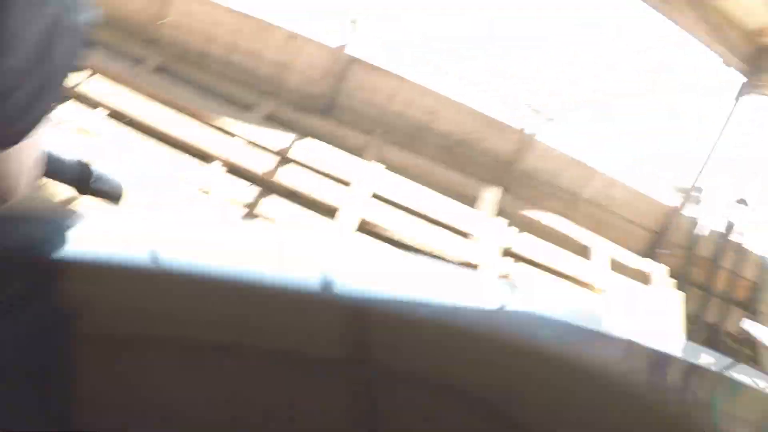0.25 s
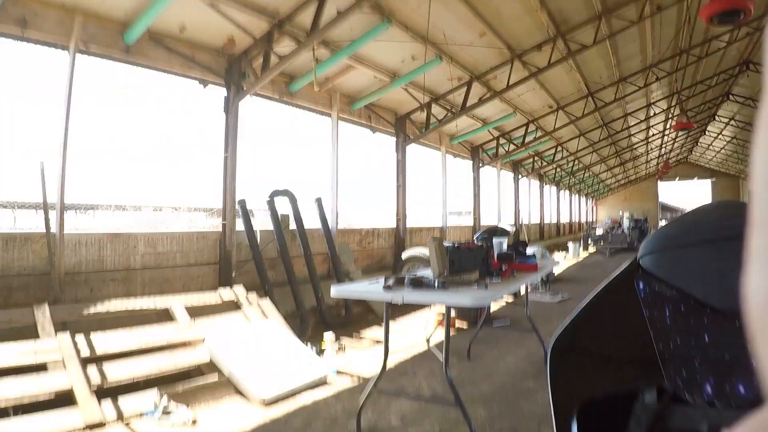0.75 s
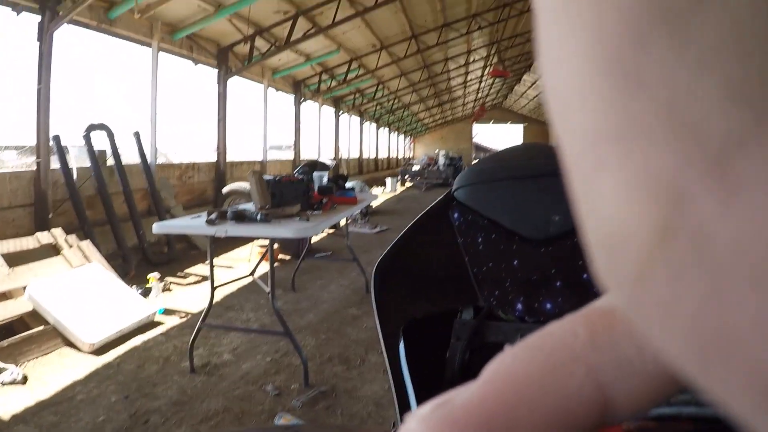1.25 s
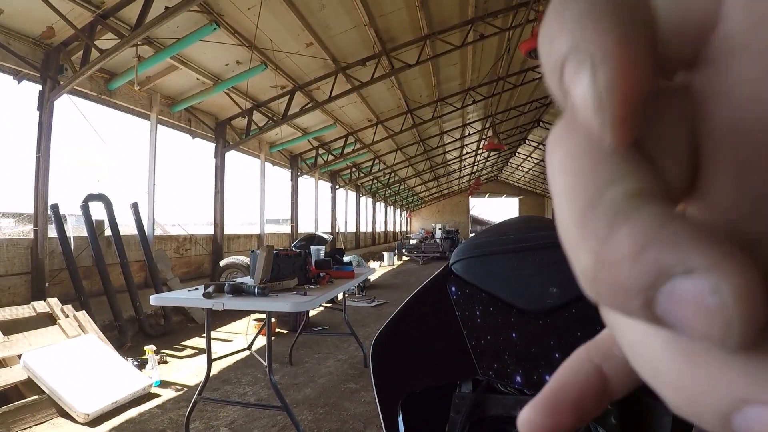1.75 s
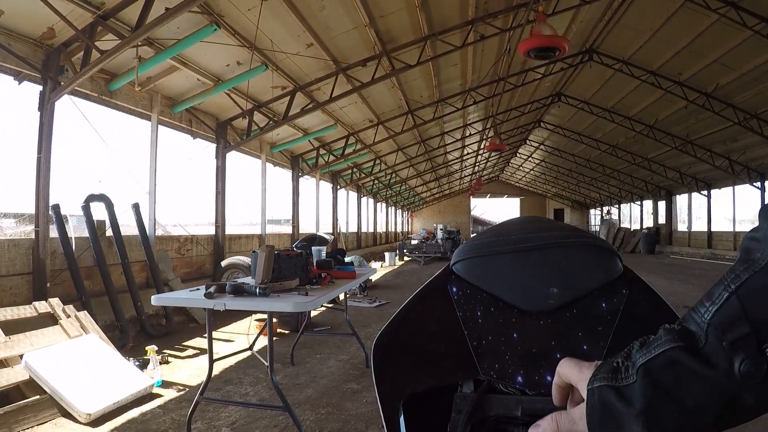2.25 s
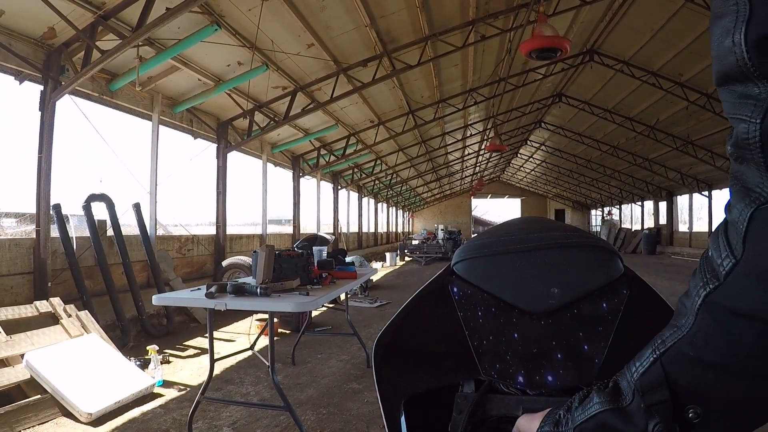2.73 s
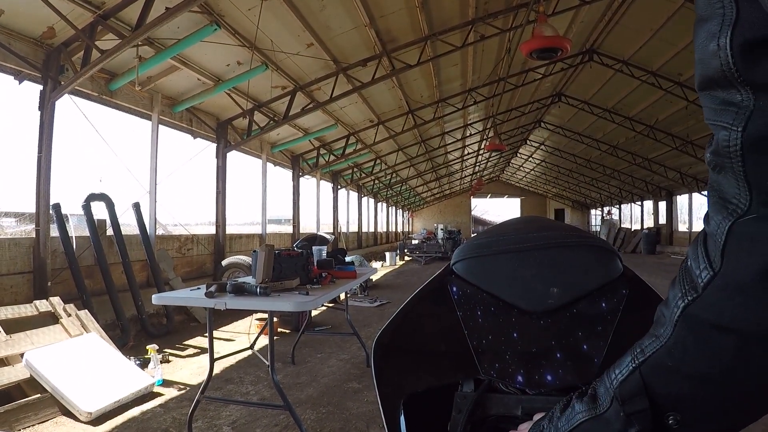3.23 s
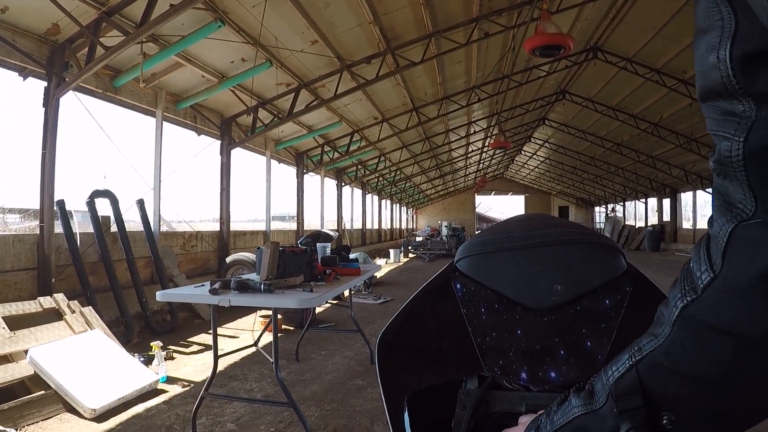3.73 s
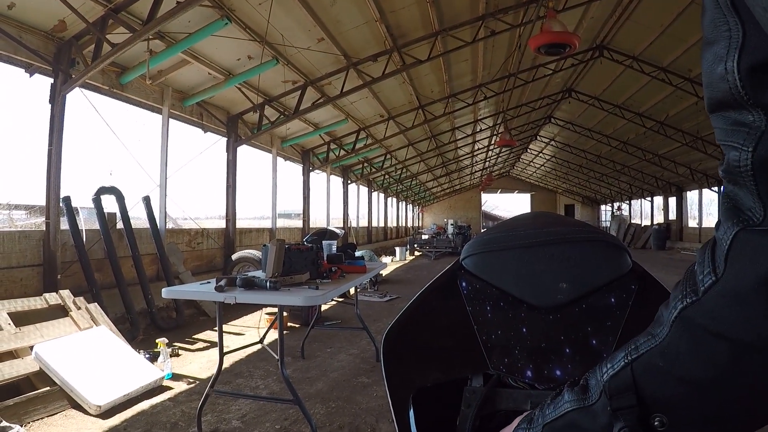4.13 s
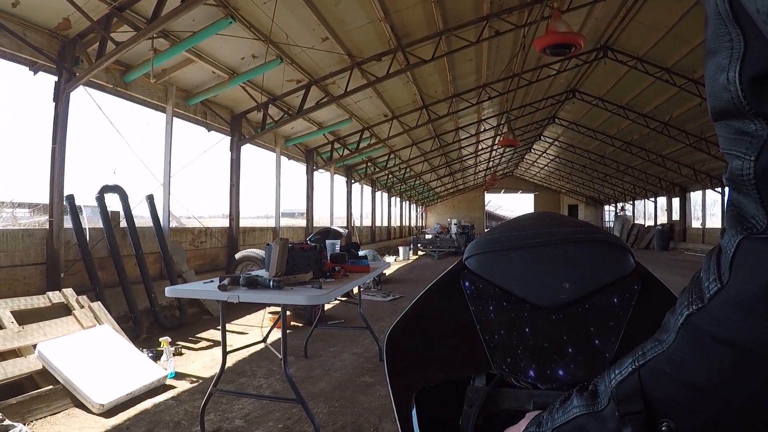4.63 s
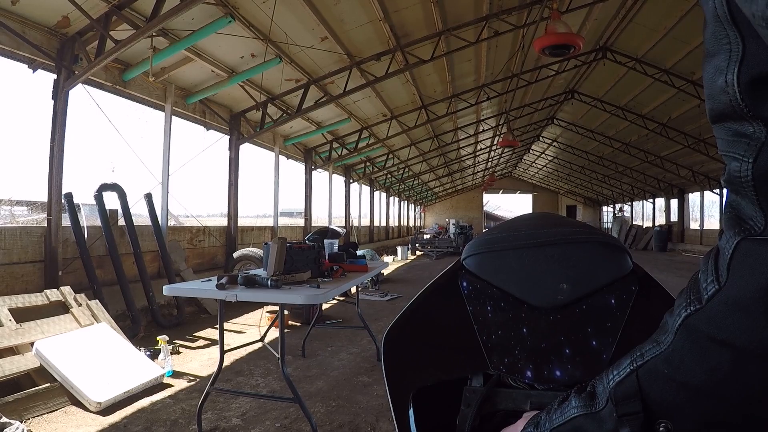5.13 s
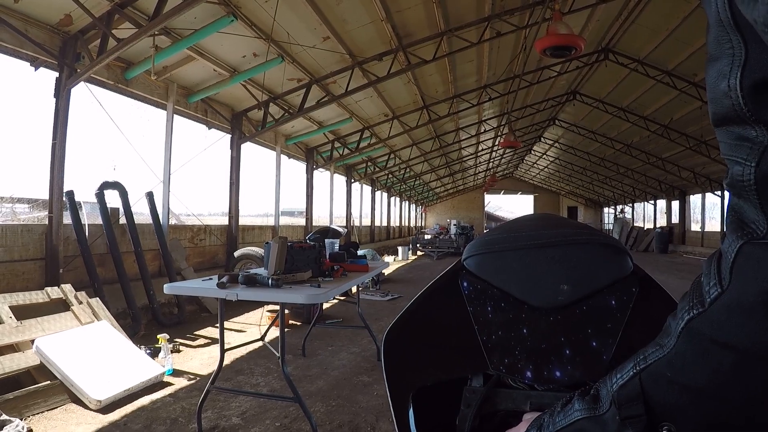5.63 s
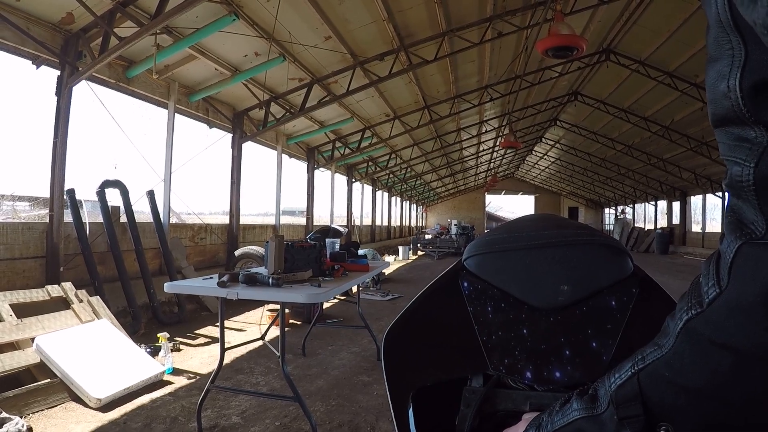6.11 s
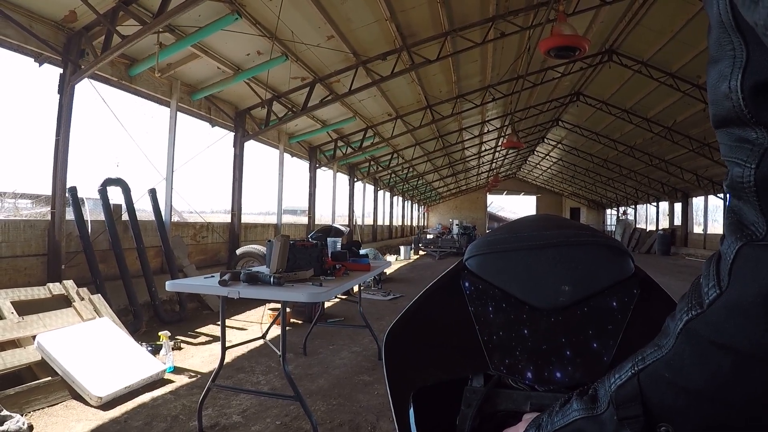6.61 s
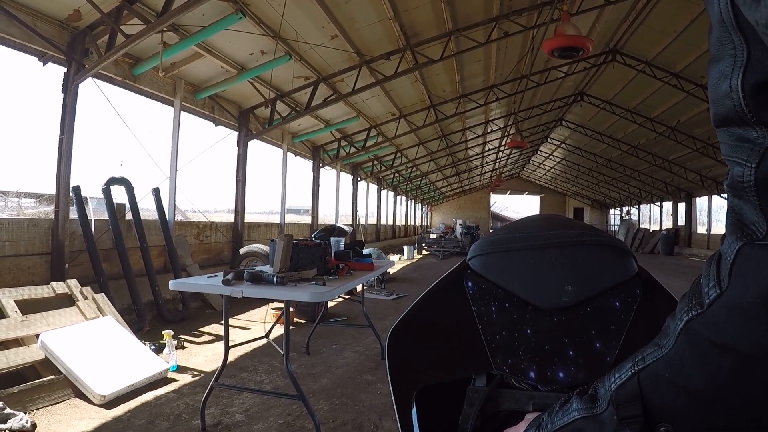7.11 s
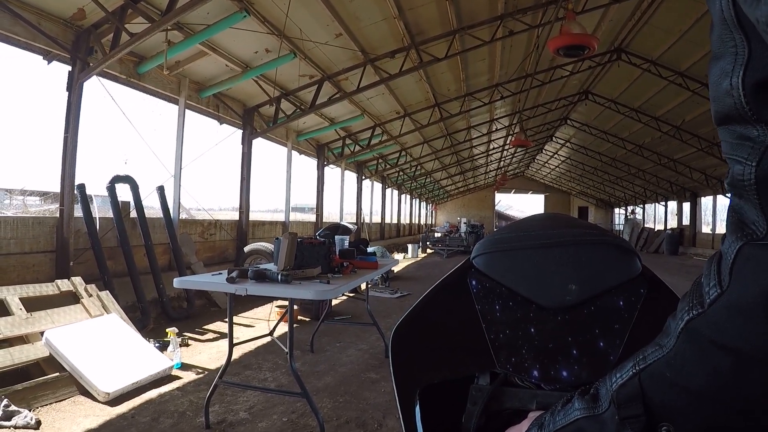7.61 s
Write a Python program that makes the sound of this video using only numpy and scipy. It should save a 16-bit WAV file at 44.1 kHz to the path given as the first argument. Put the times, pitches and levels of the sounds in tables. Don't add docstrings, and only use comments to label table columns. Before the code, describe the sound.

A four-cylinder motorcycle engine is already held against its rev limiter and stays there for nearly 8 seconds: a dense, loud drone with its strongest tone near 125 Hz, rich harmonics up to several hundred hertz, and tiny pitch wavers. Uneven firing adds a rough, rapid flutter, strongest at the start; turbulent valve and intake hiss spreads wide above it. From 0 to 0.8 s the close stereo microphone is moved: a grip at left, a brief skin brush at 0.18, low wind thumps near 0.2, 0.46 and 0.7, pressing rubs at 0.67, then a clatter of plastic clicks from 0.73 to 0.81. A faint release rub comes at 1.07. From 1.4 s the loose housing buzzes raspily with every firing, fullest around 3.4, weakening after 4.5 and gone by about 7.3. The engine continues unchanged, with short diffuse barn reflections, and never drops to idle.

```python
import sys
import numpy as np
from scipy import signal
from scipy.fft import rfft, irfft
from scipy.io import wavfile
from scipy.ndimage import uniform_filter1d, minimum_filter1d

SR = 44100
rng = np.random.default_rng(int(sys.argv[2]) if len(sys.argv) > 2 else 0)


def unload_audio(sound):
    columns = np.transpose(np.atleast_2d(sound))
    steps = np.round(np.clip(columns, -1, 1) * 32767)
    wavfile.write(sys.argv[1], SR, steps.astype(np.int16))


def attenuation_scalar(level_db):
    decades = np.asarray(level_db, float) / 20
    return 10 ** decades


N = 346626

# time in seconds, speed in turns per second (Hz).
CRANK_SPEED = [(0, 62.3), (.15, 63.0), (.45, 62.2), (.75, 62.5), (1.05, 61.8), (1.25, 62.05), (2.35, 60.85),
               (2.65, 61.45), (4.2, 61.42), (4.35, 61.85), (4.5, 61.0), (4.85, 61.55), (5.7, 61.3),
               (5.85, 60.85), (6.3, 61.4), (6.5, 62.25), (7.5, 62.25), (7.86, 61.5)]
# multiple of crank speed, rms level in dB.
HUM_ORDERS = [(1, -31), (1.5, -25), (2, -13), (2.5, -27), (3, -26), (3.5, -50.5), (4, -31.5), (4.5, -32.5),
              (5, -20.5), (5.5, -36), (6, -18.5), (6.5, -37.5), (7, -30.5), (7.5, -52), (8, -27.5),
              (8.5, -37), (9, -50.5), (9.5, -37), (10, -31), (10.5, -39), (11, -45), (11.5, -44),
              (12, -39.5), (14, -53.5), (16, -49.5), (20, -59), (24, -60.5)]
# frequency in Hz, width in Hz, level in dB.
EXHAUST_MODES = [(74, 19, 4.5), (130, 57.5, 2.5), (196, 52, -2), (270, 34.7, -4), (361.4, 24.6, -7.5),
                 (447, 14.7, -10), (502.4, 43, -6.5), (591, 27.3, -11), (668, 35, -14), (725, 78, -28.5)]
# frequency in Hz, density in dB per Hz.
HISS_SPECTRUM = [(470, -35.5), (800, -2.5), (929, -3.5), (973, -8), (1180, -8), (1670, -12), (1960, -17),
                 (2150, -17), (2530, -21.5), (3180, -19.5), (4000, -22.5), (4150, -23.5), (6880, -21.5),
                 (10400, -35.5), (12500, -81), (16300, -109), (22000, -120)]
# frequency in Hz, side against middle in dB.
HISS_SIDE = [(60, -24), (110, -21.5), (190, -15.5), (350, -7.5), (630, -1), (1140, 3.5), (2060, 3),
             (3710, 0), (6690, -1.5), (12100, -17)]
# frequency in Hz, width in Hz, level in dB.
CAVITY_MODES = [(3460, 150, 1.5), (6940, 1100, -0.5)]
# time in seconds, level in dB.
FACING = [
    (0, -0.5),
    (.08, 2),
    (.3, -6),
    (.55, 1.5),
    (.9, -2),
    (1.3, -1.5),
    (3, 3),
    (4, -1),
    (5, -1),
    (7.86, 0.5),
]
# frequency in Hz, density in dB per Hz.
RUB_SPECTRUM = [(200, -4), (400, -2), (900, -14.5), (2000, -20), (4000, -25.5), (6500, -22), (10000, -31),
                (14000, -44.5), (16000, -74)]
# start in seconds, hold in seconds, level in dB,
# left minus right in dB.
STROKES = [
    (0, 0.0015, -38, 18),
    (0.183, 0.0074, -32, 10.5),
    (0.524, 0.05, -67, 4),
    (0.669, 0.09, -41, 6),
    (.76, 0.06, -45.5, -11.5),
    (1.07, .004, -45, -3.5),
]
# peak time in seconds, level in dB.
GUSTS = [
    (.14, -29),
    (.2, -22),
    (.46, -22),
    (.7, -22),
]
# start in seconds, peak in dB, length in seconds, brightness in dB.
CLICKS = [(0.548, -47, 0.00073, 13), (0.7292, -27.5, .001, 7), (0.7334, -24.5, 0.0013, 2),
          (0.734, -18, 0.002, -1.5), (0.7447, -29.5, 0.0011, -2.5), (0.747, -26, 0.0014, 0.5),
          (0.756, -23.5, 0.0027, -7), (0.7585, -26, 0.0033, -3.5), (0.765, -21.5, 0.0023, -7),
          (0.778, -38, 0.0033, -3), (0.7797, -24, 0.0012, 1.5), (0.786, -24.5, 0.0018, -7.5),
          (0.789, -28, 0.00077, -1), (0.794, -26.5, 0.0015, -5), (0.794, -23, 0.0016, 0),
          (0.808, -22.5, 0.0033, -5.5)]
# frequency in Hz, width in Hz, level in dB.
MOUNT_MODES = [(1400, 220, -3), (2610, 430, 1.5), (3630, 490, -0.5), (6100, 1100, -3), (9500, 5200, -17)]
# time in seconds, buzz level in dB.
LOOSENESS = [
    (1.4, -45),
    (3.4, -41),
    (4.25, -42),
    (4.8, -45.5),
    (6.5, -49),
    (6.75, -46),
    (6.9, -47),
    (7.2, -50.5),
    (7.3, -65),
]
# frequency in Hz, density in dB per Hz.
BUZZ_SPECTRUM = [(600, 2), (1000, 3.5), (1800, -19.5), (2550, -6), (3100, -14), (3700, -11.5), (4800, -16),
                 (5700, -7), (7000, -11), (9000, -19.5), (12500, -29.5), (16000, -61.5)]
# frequency in Hz, left minus right in dB.
PORT_BALANCE = [(30, -4), (75, 1), (125, -1), (185, -3), (250, -3), (310, -8.5), (370, -6.5), (490, -13.5),
                (630, -13.5), (740, -5.5), (1140, -3.5), (2060, -0.5), (3710, -2.5), (6690, -14.5),
                (12100, 2.5)]
# frequency in Hz, left's lead in radians.
PORT_LEAD = [(60, -.2), (90, -.25), (125, -.48), (185, -.2), (250, .4), (340, 0), (490, .8), (650, 2.6),
             (1380, 2.2), (1810, .8), (2500, 1.6), (3700, .8), (4390, .3), (4820, -3.1), (6290, -6.3)]
# frequency in Hz, diffuse against direct sound in dB.
BARN_DIFFUSE = [(300, -40), (700, -18), (1500, -9), (4000, -10), (8000, -10), (14000, -10)]


def rms_one(x):
    return x / np.sqrt(np.mean(x ** 2) + 1e-20)


def in_time(rows):
    s, *columns = np.transpose(rows)
    return [np.interp(np.arange(N) / SR, s, column) for column in columns]


def at_hz(points):
    bins_hz = np.maximum(np.arange(N // 2 + 1) * SR / N, 1)
    hz, values = np.transpose(points)
    return np.interp(np.log(bins_hz), np.log(hz), values)


def colour(x, spectrum):
    highpass = signal.butter(4, spectrum[0][0], "high", fs=SR, output="sos")
    closed = signal.sosfilt(highpass, x)
    return rms_one(irfft(rfft(closed) * attenuation_scalar(at_hz(spectrum)), N))


def drift(rate):
    every = 40
    pole = np.exp(-80 * np.pi * rate / SR)
    white = rng.standard_normal(N // every + 2002)
    slow = signal.lfilter([1], [1, -2 * pole, pole * pole], white)[2000:]
    return np.interp(np.arange(N) / every, np.arange(len(slow)), rms_one(slow))


def resonate(x, modes):
    out = 0
    for k, (hz, width, db) in enumerate(modes):
        r = np.exp(-np.pi * width / SR)
        top = np.array([1, 0, -1]) * (1 - r * r) / 2
        bottom = [1, -2 * r * np.cos(2 * np.pi * hz / SR), r * r]
        out = out + (-1) ** k * attenuation_scalar(db) * signal.lfilter(top, bottom, x + 1e-18)
    return out


def swell(s, hold, db, rise, fall):
    t = np.arange(N) / SR - s
    return attenuation_scalar(db + rise * np.minimum(t, 0) - fall * np.maximum(t - hold, 0))


def firing_strengths():
    alternate = 0.72
    neighbour = 0.32
    chance = rng.standard_normal(1200)
    return rms_one(signal.lfilter([1, neighbour], [1, 0, 0, 0, alternate], chance)[100:])


def standing_field(crank):
    null_hz, null_width_hz = 61.45, .3
    null = np.exp(-((crank - null_hz) / null_width_hz) ** 2)
    near = np.exp(-np.arange(N) / SR / 0.33)
    eighth_db = -20 - 7 * null
    tenth_db = -27.5 - 9 * null + 10 * near
    upper_db = 6 - 3 * null - 25 * near
    flutter_db = -17 - 5 * (crank - null_hz) + 7.5 * near
    return eighth_db, tenth_db, upper_db, flutter_db


def hum(turns, eighth_db, tenth_db, upper_db):
    exhaust = rfft(resonate(np.arange(SR) == 0, EXHAUST_MODES))
    out = 0
    for multiple, db in HUM_ORDERS:
        place_db = (eighth_db + 25) * (multiple == 8) + (tenth_db + 32) * (multiple == 10)
        place_db = place_db - .4 * (eighth_db + 23) * (multiple == 6)
        place_db = place_db + upper_db * (multiple > 11.5)
        firing = 2 * round(multiple / 2)
        phase = np.angle(exhaust[round(61.5 * firing)]) + .575 * firing - 3.8 * (multiple - firing) ** 2
        waver = np.sqrt(multiple) * (1 + 3 * (multiple % 1) * (multiple > 3))
        level_waver_db = .45 * waver * drift(4.0)
        phase_waver = .06 * waver * drift(6.0)
        angle = 2 * np.pi * multiple * turns + phase + phase_waver
        out = out + attenuation_scalar(db + place_db + level_waver_db) * np.cos(angle)
    return np.sqrt(2) * out


def flutter(firings, strengths, depth_db):
    train = np.bincount(firings, strengths[:len(firings)], N)
    pulses = rms_one(resonate(train, EXHAUST_MODES))
    eddies = rng.standard_normal((2, N))
    ringing = resonate(eddies[0], EXHAUST_MODES[::2]) + resonate(eddies[1], EXHAUST_MODES[1::2])
    turbulence = attenuation_scalar(-23) * rms_one(ringing)
    silencer = signal.butter(4, 5000, fs=SR, output="sos")
    return signal.sosfilt(silencer, attenuation_scalar(depth_db + 2.5) * pulses + turbulence)


def hiss(turns):
    shared, apart = (colour(white, HISS_SPECTRUM) for white in rng.standard_normal((2, N)))
    apart = irfft(rfft(apart) * attenuation_scalar(at_hz(HISS_SIDE)), N)
    facing_db, = in_time(FACING)
    puffs_db = 1.5 * np.cos(2 * np.pi * (2 * turns - .3))
    hiss_db = -45.5 + .7 * facing_db + puffs_db + 1.4 * drift(31)
    valves = attenuation_scalar(hiss_db) * (shared * attenuation_scalar([[-1.5], [1.5]]) + apart * [[1], [-1]])

    covered = np.exp(-((np.arange(N) / SR - .64) / .06) ** 2)
    whistle_db = -55 + 1.3 * facing_db - 20 * covered + 2.5 * drift(17)
    whistle = rms_one(resonate(resonate(rng.standard_normal(N), CAVITY_MODES), CAVITY_MODES))
    top_end = signal.cheby2(12, 40, 11700, fs=SR, output="sos")
    return signal.sosfilt(top_end, valves + attenuation_scalar(whistle_db) * whistle)


def rubbing():
    grains = attenuation_scalar(2.1 * drift(160))
    skin = colour(rng.standard_normal(N) * grains, RUB_SPECTRUM) * attenuation_scalar(4.5)
    strokes = 0
    for s, hold, db, pan_db in STROKES:
        sides = attenuation_scalar([[pan_db / 2], [-pan_db / 2]])
        strokes = strokes + swell(s, hold, db, rise=380, fall=1100) * sides
    return skin * strokes


def wind():
    band = signal.butter(2, [18, 80], "band", fs=SR, output="sos")
    air = signal.sosfilt(band, rng.standard_normal((2, N)))
    air = air + 1.5 * air.sum(axis=0)
    still_air = attenuation_scalar(-44.5)
    gusts = still_air + sum(swell(s, 0, db, rise=200, fall=320) for s, db in GUSTS)
    lumps = attenuation_scalar(4 * drift(10))
    return rms_one(air) * gusts * lumps


def clicks():
    t = np.arange(N // 8) / SR
    noise = rng.standard_normal(len(t))
    out = np.zeros(N)
    for s, db, length, bright_db in CLICKS:
        snap = noise * (t > s) * np.exp(-np.maximum(t - s, 0) / length)
        modes = [(hz, width, level_db + bright_db * (hz > 3000)) for hz, width, level_db in MOUNT_MODES]
        out[:len(t)] += attenuation_scalar(db + 5.5) * resonate(snap, modes)
    return out * attenuation_scalar([[-4.5], [4.5]])


def buzz(turns, strengths, catch_db):
    buzz_db, = in_time(LOOSENESS)
    bright_db = -3.5 - 0.7 * (buzz_db - LOOSENESS[0][1])
    step = (2 * turns) % 1
    burst = np.exp(-((step - .3) / .075) ** 2)
    rebound = np.exp(-((step - .78) / .07) ** 2)

    knocks = attenuation_scalar(rng.normal(0, 2.3, 2400))[(4 * turns).astype(int)]
    follow_db = 0.86 * strengths[(2 * turns).astype(int)] + 0.57 * drift(18)
    shaken = rng.standard_normal(N) * knocks * attenuation_scalar(follow_db)
    dull = colour(shaken * (burst + .3 * rebound + .12), BUZZ_SPECTRUM)
    bright = colour(shaken * (burst + .95 * rebound + .25), BUZZ_SPECTRUM)

    split = signal.butter(2, 4700, fs=SR, output="sos")
    low = signal.sosfiltfilt(split, dull)
    high = bright - signal.sosfiltfilt(split, bright)
    seated = np.clip((np.arange(N) / SR - 1.36) / 0.045, 0, 1)
    return seated * attenuation_scalar(buzz_db + catch_db + 8.5) * (low + attenuation_scalar(bright_db - 0.5) * high)


def ports(x):
    t = np.arange(SR // 2) / SR
    tails = rng.standard_normal((2, len(t))) * attenuation_scalar(-60 * t / 0.06) * (t > .008)
    tails = tails / np.sqrt(np.sum(tails ** 2, axis=1, keepdims=True))
    barn = rfft(tails, N) * attenuation_scalar(at_hz(BARN_DIFFUSE))
    left = attenuation_scalar(at_hz(PORT_BALANCE)) * np.exp(1j * at_hz(PORT_LEAD))
    return irfft(rfft(x) * np.array([left * (1 + barn[0]), 1 + barn[1]]), N)


def scene():
    crank, = in_time(CRANK_SPEED)
    turns = np.cumsum(crank) / SR
    firings = np.flatnonzero(np.diff(np.floor(2 * turns)))
    strengths = firing_strengths()
    eighth_db, tenth_db, upper_db, flutter_db = standing_field(crank)
    sag = np.maximum(-np.gradient(crank) * SR, 0)
    catch_db = 0.35 * uniform_filter1d(sag, size=2000)

    engine = hum(turns, eighth_db, tenth_db, upper_db) + flutter(firings, strengths, flutter_db + catch_db)
    valve_gear = hiss(turns)
    handling = rubbing() + wind() + clicks()
    return ports(engine + buzz(turns, strengths, catch_db)) + valve_gear + handling


def low_pass(x):
    return signal.sosfilt(signal.butter(12, 12660, fs=SR, output="sos"), x)


def record(dry):
    power = uniform_filter1d(np.mean(dry ** 2, axis=0), round(0.031 * SR))
    level_db = 10 * np.log10(power + 1e-9)
    held = dry * attenuation_scalar(-.4 * (level_db + 10.5))

    peaks = np.max(np.abs(held), axis=0)
    room_left = minimum_filter1d(np.minimum(1, .94 / (peaks + 1e-9)), size=400)
    limited = held * uniform_filter1d(uniform_filter1d(room_left, size=200), size=200)
    capsule = signal.butter(4, 11000, fs=SR, output="sos")
    return low_pass(signal.sosfilt(capsule, limited))


dry = scene()
out = record(dry)
unload_audio(out)
```